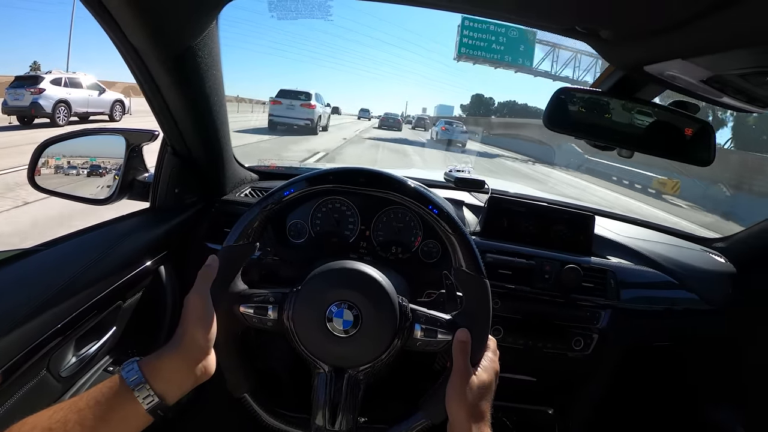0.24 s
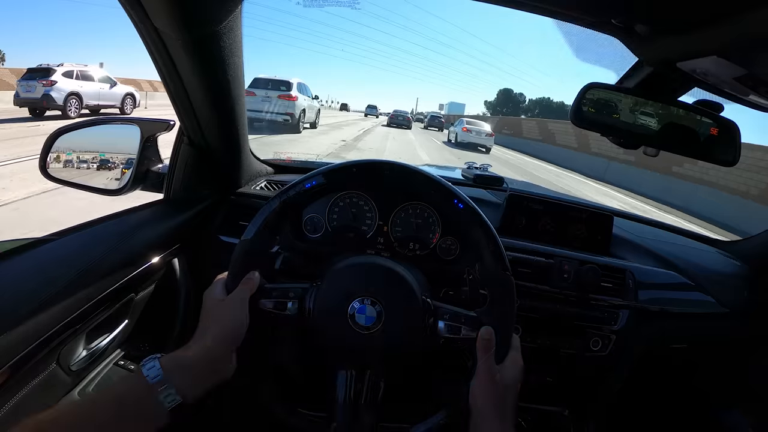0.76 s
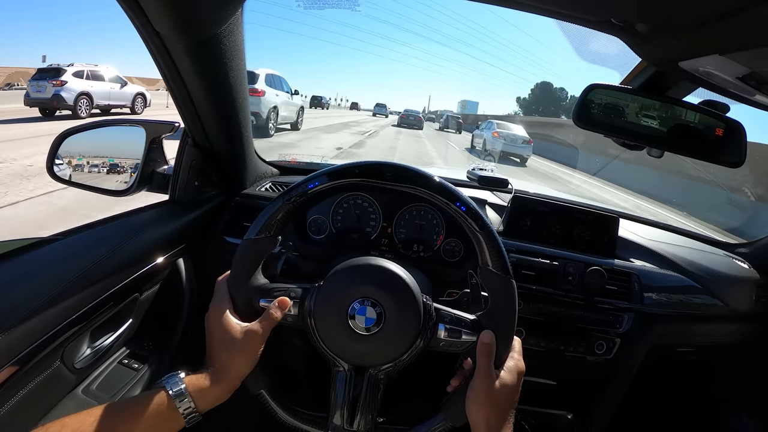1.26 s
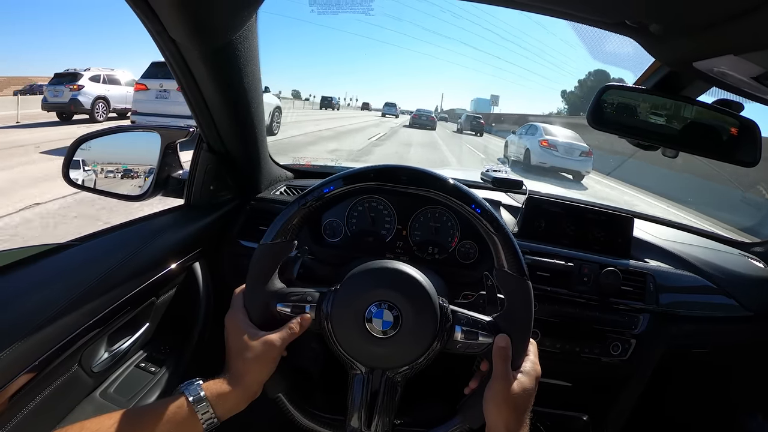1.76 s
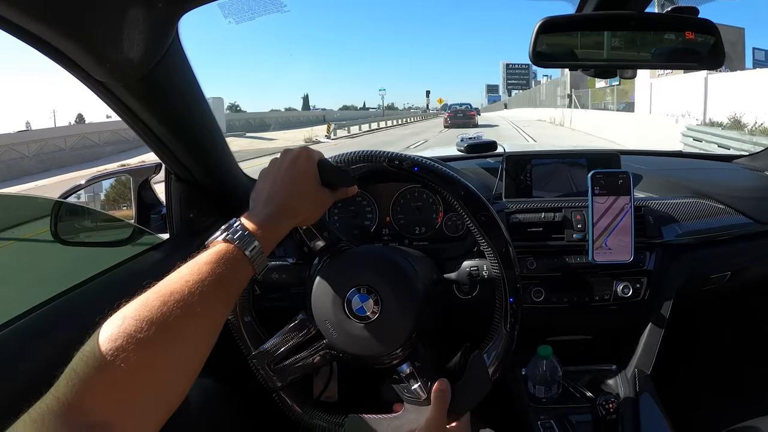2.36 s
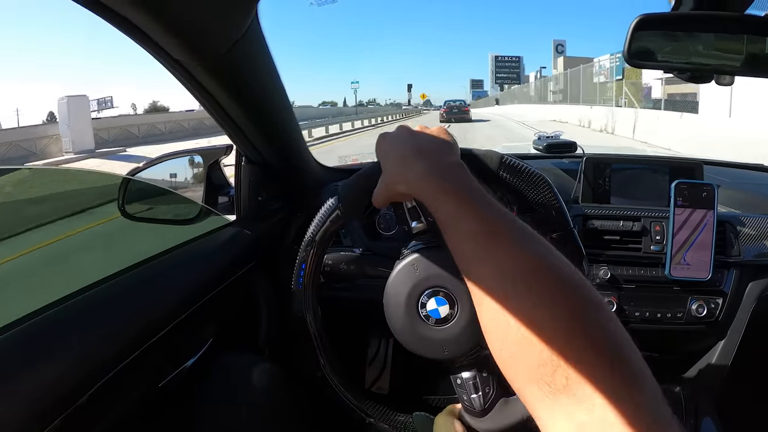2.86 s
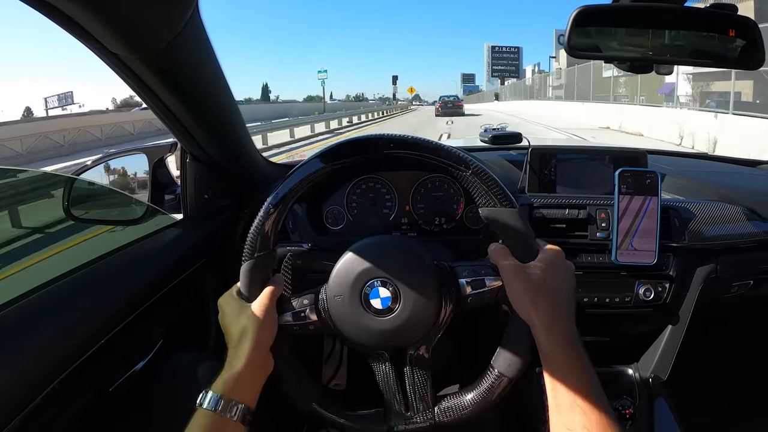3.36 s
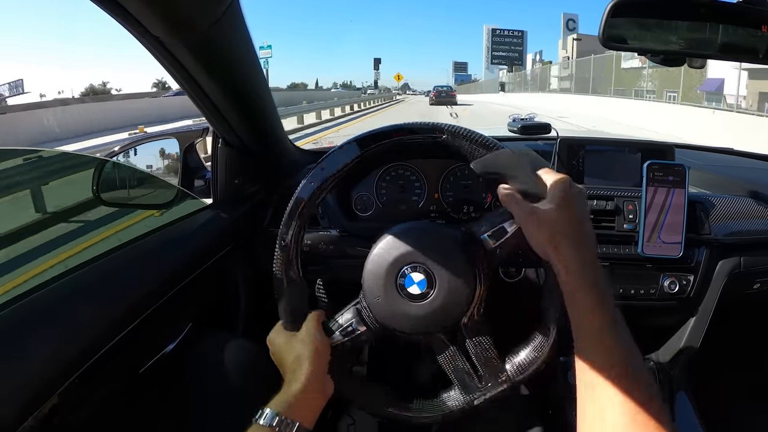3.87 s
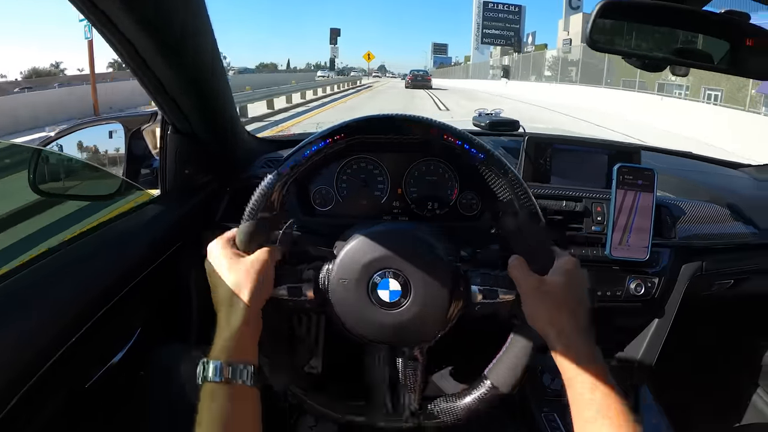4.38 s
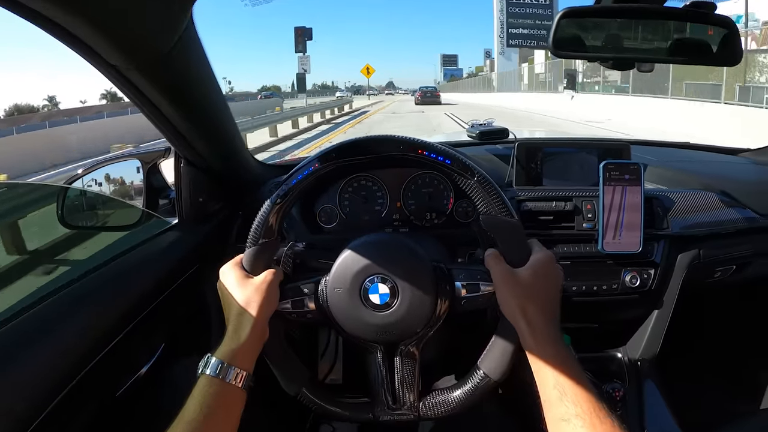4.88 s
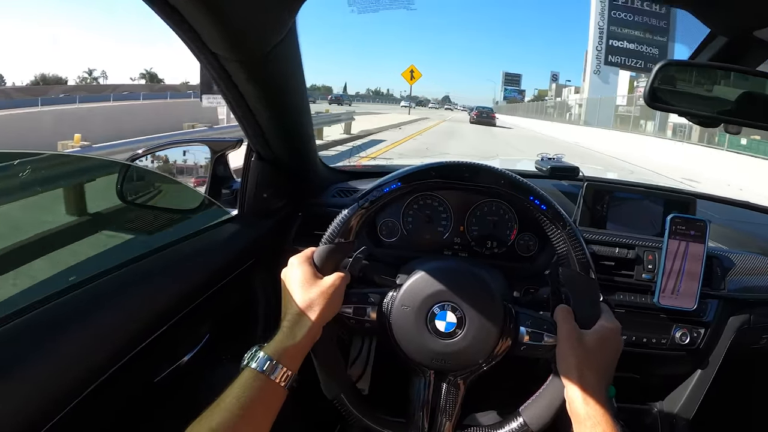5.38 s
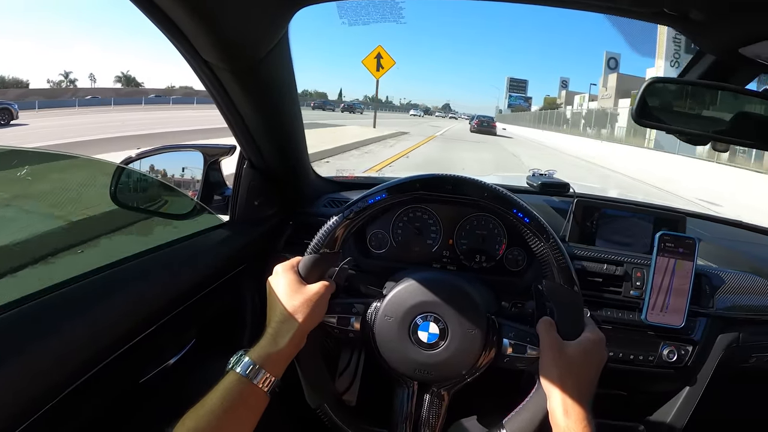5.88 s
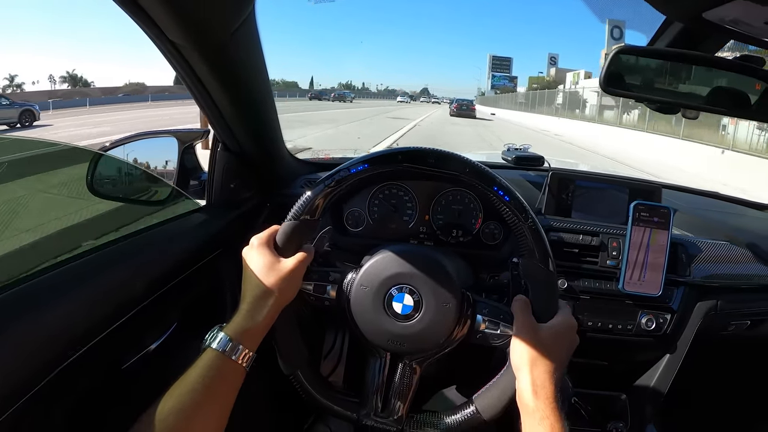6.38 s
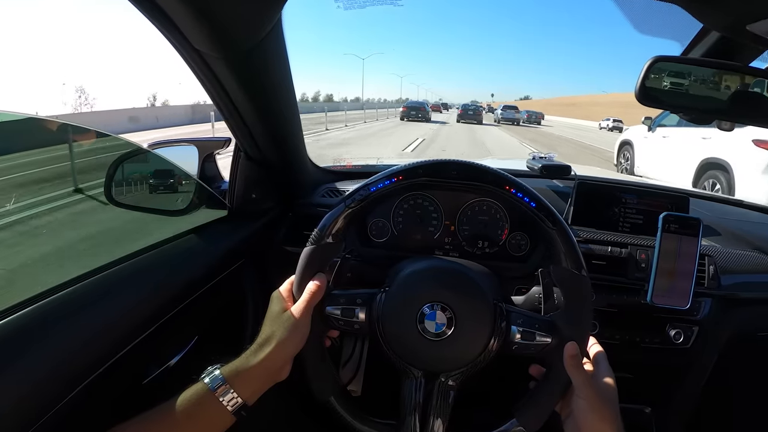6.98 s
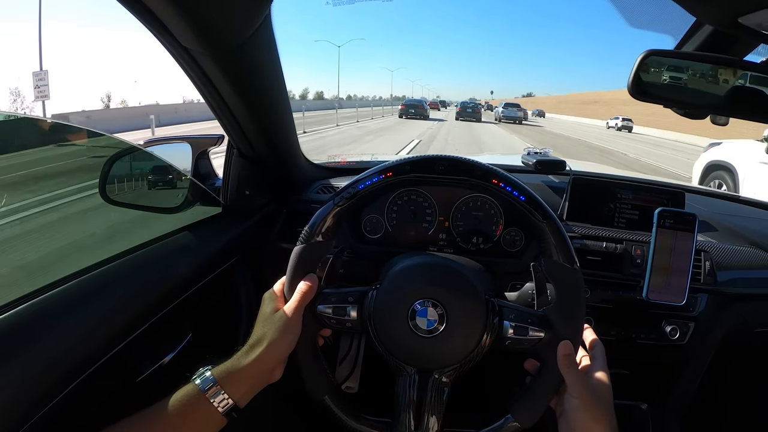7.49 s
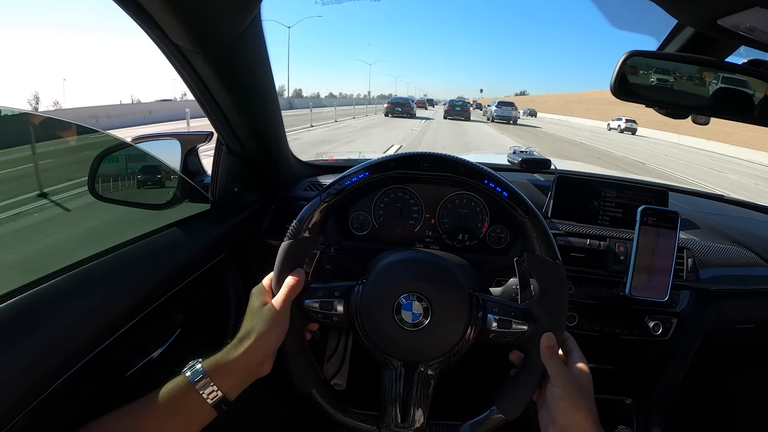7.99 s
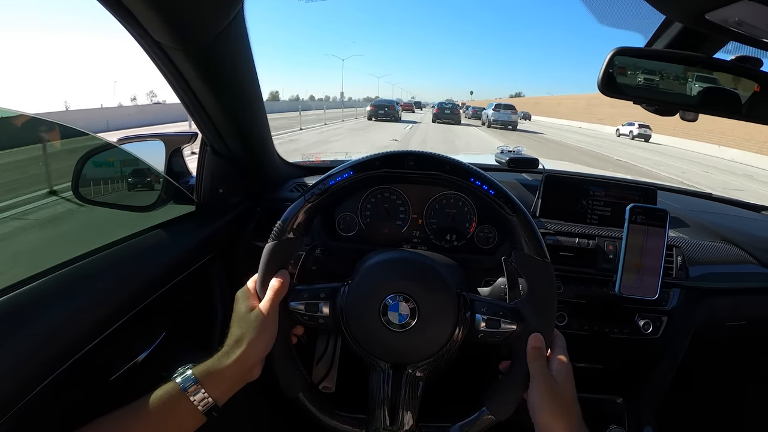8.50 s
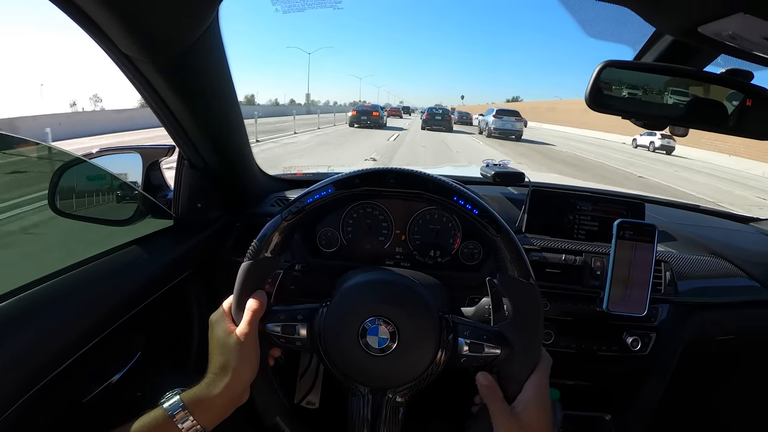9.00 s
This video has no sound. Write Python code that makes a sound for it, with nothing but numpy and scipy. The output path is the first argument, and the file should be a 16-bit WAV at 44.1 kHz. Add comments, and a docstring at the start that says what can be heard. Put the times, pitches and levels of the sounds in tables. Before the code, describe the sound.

Close inside a car with the window down, a deep exhaust hum swells and lifts off with a burble. A hard cut brings a fierce rising rev with slipping driveline rasp, then a sudden drop, clacks and sharp cracks as gears change. After another cut the engine pulls again, drops a gear-step, clicks and pops, then eases. Wind thump, tyre roar and airy hiss surround it throughout.

```python
"""Inside a turbocharged car with an open exhaust, window down, on a freeway: three stretches joined by hard cuts.
Engine and driveline are sums of sines on whole multiples of a gliding rate, coloured by body and pipe.
Burble, boom and cracks are pops ringing exhaust resonances; clicks are noise bursts coloured by trim.
Cabin thump, tyre roar, hiss and sizzle are shaped noise; a tyre whine and a trim buzz sound briefly.
Two close ports pick it up and a limiter holds the peaks."""
import sys
import numpy as np
from scipy import signal
from scipy.fft import rfft, irfft, next_fast_len
from scipy.io import wavfile
from scipy.ndimage import uniform_filter1d, minimum_filter1d, map_coordinates

SR = 44100
rng = np.random.default_rng(int(sys.argv[2]) if len(sys.argv) > 2 else 0)


def volts_from_db(level):
    """Convert decibel levels to linear amplitude ratios."""
    exponent = np.asarray(level, float) / 20
    return 10 ** exponent


def wav_record(signal):
    """Record a signal, one row per channel, as 16-bit PCM in the file named by sys.argv[1]."""
    frames = np.transpose(np.atleast_2d(signal))
    bounded = np.clip(frames, -1, 1)
    # unit amplitude maps onto the largest positive 16-bit level
    quanta = np.round(bounded * 32767).astype(np.int16)
    wavfile.write(sys.argv[1], SR, quanta)


N = 407925

# joins between the stretches: (time [s])
CUTS_S = [2.0148, 6.819]
# engine note: (time [s], pulse rate [Hz], fundamental [dB], load level that sets the overtones [dB],
# sharpness [dB per multiple])
ENGINE_NOTE = [(0.0, 78.4, -29.5, -18.5, -2.3), (0.35, 80.32, -25, -20, -0.9),
               (0.7, 82.7, -22.5, -18.5, 0.1), (0.92, 82.1, -19, -15.5, 1), (0.98, 80.1, -23.5, -29.5, -2),
               (1.6, 79.8, -13, -35, -0.3), (2.014, 78.57, -14.5, -31, -1), (2.015, 71.5, -31, -19, 1.5),
               (2.2, 77.27, -25, -23, -5), (2.35, 79.43, -24, -17.5, -3), (2.5, 89.9, -10.5, -28, -4),
               (2.65, 101.0, -11.5, -28.0, 1.0), (2.8, 117.2, -9.5, -23.0, 1.5),
               (2.95, 136.6, -4.5, -21.5, -2.5), (3.2, 153.4, -4, -25.5, -3.7),
               (3.48, 162.7, -6, -34.5, -8), (3.8, 177.0, -10.5, -30, -2.5), (4.12, 182.8, -10.5, -30.5, 2),
               (4.17, 159.2, -36, -34, 6), (4.24, 136.0, -16, -34.5, 0), (4.35, 128.9, -11.5, -41.5, -3.5),
               (4.52, 142.6, -7, -26.5, -5), (4.64, 134.6, -8, -32.0, -3.5), (4.75, 109.6, -19, -34.5, 0.5),
               (4.95, 95.6, -10.5, -25.5, 0.2), (5.15, 92.8, -9.5, -17.5, -0.2),
               (5.35, 93.97, -10, -20, 1.2), (5.515, 95.9, -10, -19, -0.5), (5.74, 98.6, -6.5, -22.5, 1.2),
               (5.82, 95.7, -15.5, -42.5, 1.5), (6.3, 96.6, -13.0, -39, -4.5), (6.5, 92.4, -17.5, -39.5, 0),
               (6.818, 93.4, -14.0, -37, -4.5), (6.819, 121.0, -10.5, -33.5, -2),
               (7.15, 124.7, -9.5, -25.5, -1.5), (7.55, 132, -7.5, -23.5, -3.5),
               (7.66, 97.3, -12.5, -26.5, 3), (7.76, 103.5, -8, -23, 1), (7.86, 101.4, -12, -31, 1.6),
               (8.22, 105.2, -11, -27.5, 1.5), (8.36, 106.5, -12.5, -26, 0.3),
               (8.66, 109.5, -10.5, -23.5, -0.5), (8.75, 110.9, -18, -33.5, 0.7),
               (9.0, 106.8, -15, -40, 0.4), (9.25, 104.8, -15.5, -39, -5)]


def unit(x):
    """Scale to rms 1."""
    return x / np.sqrt(np.mean(x ** 2) + 1e-20)


def along(points, hz):
    """Interpolate (frequency [Hz], value) points on a log axis."""
    f, v = np.transpose(points)
    return np.interp(np.log(hz + 1), np.log(f + 1), v)


def curves(rows):
    """One value per sample for each column after the time."""
    s, *cols = np.transpose(rows)
    t = np.arange(N) / SR
    return np.array([np.interp(t, s, c) for c in cols])


def swells(rows, floor_db=-90):
    """Level [dB] of bell-shaped (time [s], half length [s], level [dB]) swells added to a floor."""
    t = np.arange(N) / SR
    bells = sum(volts_from_db(db) * np.exp(-((t - s) / half) ** 2) for s, half, db in rows)
    return 20 * np.log10(volts_from_db(floor_db) + bells)


def wobble(knots_per_s):
    """Smooth random curve through normal knots."""
    knots = rng.standard_normal(int(N * knots_per_s / SR) + 4)
    return map_coordinates(knots, [np.arange(N) * knots_per_s / SR])


def stretch():
    """Index of the stretch of driving that each sample lies in."""
    return np.searchsorted(CUTS_S, np.arange(N) / SR)


def filtered(x, response):
    """Apply a complex response of frequency [Hz]."""
    m = next_fast_len(N + SR // 2)
    return irfft(rfft(x, m) * response(np.fft.rfftfreq(m, 1 / SR)), m)[..., :N]


def resonances(modes, f):
    """Causal sum of (frequency [Hz], width [Hz], level [dB]) resonances, alternating in sign."""
    total = 0
    for k, (centre, width, db) in enumerate(modes):
        total = total + (-1) ** k * volts_from_db(db) * 1j * f * width / (centre * centre - f * f + 1j * f * width)
    return total


def turning(rate_hz):
    """Shaft phase [rad]."""
    return 2 * np.pi * np.cumsum(rate_hz) / SR


def stack(phase, levels_db, waver_db, lean_rad):
    """Sines on whole multiples; each wavers on its own, the higher the more; lean skews the pulse shape."""
    total = 0
    for k, db in enumerate(levels_db):
        level = np.sqrt(2) * volts_from_db(db + waver_db * np.sqrt(k + 1) * wobble(9))
        total = total - level * np.cos((k + 1) * phase + lean_rad * k)
    return total


def overtones(rate_hz, orders, level_db, sharp_db, odd_db=0):
    """Levels from multiple 2 up, tilted about the third, coloured by exhaust and cabin."""
    # exhaust and cabin as the low multiples meet them: (frequency [Hz], gain [dB])
    body = [(140, 5.5), (165, .4), (195, 0.3), (215, 4), (240, 0.2), (265, -2.5), (290, -3), (320, 4),
            (350, 0.6), (380, -2), (410, 0.8), (450, -2.2), (490, 0.2), (520, 4), (560, 1), (600, -0.4),
            (625, -7.5), (652, 3.5), (690, -12.5), (745, -4), (800, -9.5)]
    return [level_db + db + sharp_db * (k - 1) + odd_db * (k % 2) + along(body, (k + 2) * rate_hz)
            for k, db in enumerate(orders)]


def through_pipe(rate_hz, levels_db, count, rasp_db):
    """Add upper multiples up to count, which light up as they cross a pipe resonance."""
    # exhaust pipe as the upper multiples meet it: (frequency [Hz], width [Hz], gain [dB])
    pipe = [(770, 90, -2), (915, 70, 3), (1040, 100, 0), (1250, 200, -3)]
    upper = range(len(levels_db) + 1, count + 1)
    return levels_db + [rasp_db + 20 * np.log10(abs(resonances(pipe, k * rate_hz))) for k in upper]


def engine():
    """Firing note, nearly steady from pulse to pulse; load brings up the overtones. Returns note and phase."""
    # multiples 2 to 7: (level over the load [dB])
    engine_orders = [9, 0.5, 0.86, -1.1, -7, -2.4]
    # upper multiples: (time [s], level [dB])
    rasp = [(0, -44), (2.3, -46), (2.9, -33), (3.1, -32), (3.5, -38), (4.3, -50), (4.9, -44), (5.1, -33),
            (5.7, -34), (5.9, -55), (6.8, -55), (7.0, -41), (7.5, -35), (7.72, -29), (7.9, -33),
            (8.65, -32), (8.9, -55)]
    rate_hz, first_db, load_db, sharp_db = curves(ENGINE_NOTE)
    # a fundamental less than 13 dB over the load takes the odd multiples down with it
    odd_db = .68 * np.minimum(first_db - load_db - 13, 0)
    levels_db = [first_db] + overtones(rate_hz, engine_orders, load_db, sharp_db, odd_db)
    phase = turning(rate_hz * (1 + .0015 * wobble(25)))
    levels_db = through_pipe(rate_hz, levels_db, count=13, rasp_db=curves(rasp)[0])
    return stack(phase, levels_db, waver_db=.9, lean_rad=.3), phase


def driveline():
    """Second shaft note, middle stretch only; parts from the engine while the clutch or tyres slip."""
    # (time [s], rate [Hz], level [dB], sharpness [dB per multiple])
    shaft_note = [(2.015, 99.45, -25, 1.5), (2.2, 103.3, -22.5, 3.6), (2.5, 116, -25, -2.5),
                  (2.85, 127.8, -22, 0), (3.3, 147, -27.5, 0.6), (3.75, 153.3, -26, 1),
                  (3.87, 138.7, -25, -1.8), (4.12, 123.6, -29, -3), (4.22, 105.7, -21.5, 0.7),
                  (4.3, 109, -39.5, -3), (4.8, 108.7, -34, -2.5), (5.3, 111.2, -33.5, -2.5),
                  (5.8, 112.6, -40.5, -6), (6.05, 115.5, -37.5, -7), (6.5, 115.9, -34.5, -6),
                  (6.75, 110.8, -46.5, -4.5)]
    # multiples 2 to 5: (level over the note's level [dB])
    shaft_orders = [5, -0.7, -2.1, -3.5]
    # fundamental sounds briefly: (time [s], half length [s], level [dB])
    shudders = [(3.87, 0.057, -23.5), (4.17, .07, -8), (4.8, 0.068, -28), (6.5, .05, -8.5)]
    # upper multiples flare: (time [s], half length [s], level [dB])
    slip_rasp = [(2.55, .15, -33), (2.92, .1, -23), (3.43, .1, -28), (3.67, .08, -30)]
    rate_hz, level_db, sharp_db = curves(shaft_note)
    first_db = swells(shudders, floor_db=-42.5)
    levels_db = [first_db] + overtones(rate_hz, shaft_orders, level_db, sharp_db)
    levels_db = through_pipe(rate_hz, levels_db, count=9, rasp_db=swells(slip_rasp, floor_db=-49))
    return (stretch() == 1) * stack(turning(rate_hz), levels_db, waver_db=1.1, lean_rad=1.3)


def pops(modes, rate_hz):
    """Uneven soft pops at random times ringing a set of resonances, rms 1."""
    kicks = (rng.random((2, N)) < rate_hz / SR) * rng.standard_normal((2, N))
    soft = lambda f: f ** 2 / (f ** 2 + 55 ** 2) / (1 + 1j * f / 1500) ** 3
    return unit(filtered(kicks, lambda f: resonances(modes, f) * soft(f)))


def burble(air_swing_db):
    """Unburnt fuel and road shake: a dense rattle of the exhaust box that bursts on lift-off."""
    # exhaust box as loose pops meet it: (frequency [Hz], width [Hz], gain [dB])
    box = [(84.5, 67, 9), (212, 102, 6), (332, 74.8, 4), (536, 162, -1.5), (1020, 310, -9.5)]
    # bursts: (time [s], half length [s], level [dB])
    lift_offs = [(.975, .035, -13.5), (1.95, .05, -22.5), (4.2, 0.042, -16.5), (5.81, .06, -12.5),
                 (2.98, 0.081, -21), (7.74, 0.096, -20), (8.72, .1, -19)]
    # one per stretch: (floor level when the hiss is at -40 dB [dB])
    burble_db = [-23, -19.5, -19.5]
    level_db = swells(lift_offs, np.take(burble_db, stretch()) + .2 * air_swing_db)
    rattle = pops(box, rate_hz=900)
    # pops below about 130 Hz thin out by .4 dB for each Hz the engine runs above 130 Hz
    low = filtered(rattle, lambda f: 1 / (1 + (f / 130) ** 6))
    kept = volts_from_db(-.4 * np.clip(curves(ENGINE_NOTE)[0] - 130, 0, None))
    return volts_from_db(level_db + 1.2 * wobble(12)) * (rattle - (1 - kept) * low)


def boom():
    """Loose pops ringing the exhaust box's boom resonance; it is filtered through the resonance twice."""
    # (frequency [Hz], width [Hz], gain [dB])
    boom_mode = [(136.6, 30, 0)]
    # (time [s], half length [s], level [dB])
    booms = [(.82, 0.054, -18), (1.2, 0.036, -23), (1.75, .2, -17), (3.95, 0.23, -17.5), (4.28, .05, -15),
             (4.72, 0.076, -12), (5.8, .05, -16.5), (6.33, 0.046, -14), (6.5, 0.11, -15.5),
             (7.62, 0.045, -21), (8.2, 0.44, -19.5), (8.72, 0.037, -11.5), (8.83, .04, -10.5),
             (9.22, .05, -18.5)]
    ringing = unit(filtered(pops(boom_mode, rate_hz=150), lambda f: resonances(boom_mode, f)))
    return volts_from_db(swells(booms, floor_db=-33)) * ringing


def cracks():
    """Single sharp pops, each ringing the pipe as a decaying sine near 960 Hz."""
    # (time [s], level before a 2.5 dB cut [dB])
    crack_rows = [(4.375, -23), (4.583, -15.5), (4.601, -9.5), (5.786, -11.5), (5.846, -7), (7.157, -7.5),
                  (8.773, -15.5)]
    t60_s = .04
    out, t = np.zeros(N + SR), np.arange(SR // 10) / SR
    for s, db in crack_rows:
        hz = 960 * (1 + .04 * rng.standard_normal())
        out[round(s * SR):][:len(t)] += volts_from_db(db - 2.5 - 60 * t / t60_s) * np.sin(2 * np.pi * hz * t)
    return out[:N]


def clicks():
    """Dry plastic clack of a paddle or trim piece: noise burst with a weaker cabin tail, coloured by trim."""
    # (time [s], level before a 4 dB cut and the trim [dB], left-right [dB])
    click_rows = [(.985, -30, -1), (1.015, -25.5, -1), (1.045, -29, -3), (4.4178, -9.5, -1.0),
                  (4.5306, -13, -5), (4.587, -18, -9.5), (4.602, -23, -12), (4.618, -30, -5.5),
                  (4.8984, -31.5, -2), (5.018, -39.5, -2), (5.7906, -36, -10), (6.619, -35, -7.5),
                  (7.3282, -21.5, -6.5), (7.3525, -13.5, -1), (7.45, -15, -5.5), (8.1568, -34, -18)]
    # trim resonances: (frequency [Hz], width [Hz], gain [dB])
    trim = [(1500, 500, -0.5), (2280, 780, 6), (3400, 690, 5.5), (5140, 900, 5.5), (7000, 900, 1.5),
            (9700, 4700, -10)]
    out, t = np.zeros((2, N + SR)), np.arange(SR // 8) / SR
    attack = 1 - np.exp(-t / .0006)
    shape = attack * (volts_from_db(-60 * t / .035) + .2 * volts_from_db(-60 * t / .14))
    for s, db, pan_db in click_rows:
        near, left, right = rng.standard_normal((3, len(t)))
        gain = volts_from_db(db - 4 + np.array([[pan_db], [-pan_db]]) / 2)
        out[:, round(s * SR):][:, :len(t)] += gain * shape * (near + .6 * np.array([left, right]))
    band = lambda f: f ** 2 / (f ** 2 + 1200 ** 2) / (1 + 1j * f / 9000) ** 3
    return filtered(out[:, :N], lambda f: resonances(trim, f) * band(f))


def tyre_whine():
    """Brief fluttering tone from the road surface: a sine wandering about 1410 Hz."""
    # (time [s], half length [s], level [dB])
    whine_swells = [(9.07, .07, -30), (9.23, 0.065, -28)]
    hz = 1410 + 12 * wobble(12)
    return np.sqrt(2) * volts_from_db(swells(whine_swells)) * np.sin(turning(hz))


def trim_buzz():
    """Loose trim buzzing: noise passed twice through narrow resonances."""
    # (time [s], half length [s], level [dB])
    buzz_swells = [(8.02, .06, -42), (8.16, .07, -41), (8.31, .04, -42)]
    # (frequency [Hz], width [Hz], gain per pass [dB])
    buzz_modes = [(2610, 77, -4), (3200, 87, -6.5), (3240, 66, -4.5)]
    buzz = unit(filtered(rng.standard_normal(N), lambda f: resonances(buzz_modes, f) ** 2))
    return volts_from_db(swells(buzz_swells) + 2.5 * wobble(30)) * buzz


def rush(spectrum, patchy_db):
    """Two shaped noises, rms 1, with shared time-frequency patches of random gain."""
    z = signal.stft(rng.standard_normal((2, N)), nperseg=512)[2]
    field = uniform_filter1d(rng.standard_normal(z.shape[1:]), size=6, axis=0)
    field = uniform_filter1d(field, size=12, axis=1)
    pair = signal.istft(z * volts_from_db(patchy_db * unit(field)), nperseg=512)[1][:, :N]
    return unit(filtered(pair, lambda hz: volts_from_db(along(spectrum, hz))))


def thump():
    """Open window makes the cabin air throb: low noise with its swells partly evened out."""
    # wind at the open window: (time [s], level [dB])
    cabin = [(0.0, -25.5), (0.05, -20.5), (0.72, -17), (0.8, -26.5), (1.0, -13), (1.72, -18), (1.75, -12.5),
             (1.98, -12.5), (2.01, -27.5), (2.29, -25), (2.39, -36.5), (2.5, -20.5), (3.3, -24.5),
             (3.99, -18), (4.17, -27), (4.33, -16.5), (5.69, -22.5), (5.87, -16.5), (6.34, -18.5),
             (6.39, -27.5), (6.57, -11.5), (6.65, -16), (6.98, -10.5), (7.01, -19), (9.2, -12.5),
             (9.25, -25.5)]
    # (frequency [Hz], relative density [dB per Hz])
    thump_spectrum = [(8.8, -29.5), (15, -13), (37, 1), (65, -12), (84, -41.5), (140, -120)]
    level_db = curves(cabin)[0] + .92 * wobble(3.6)
    throb = rush(thump_spectrum, patchy_db=-1.5)
    swell = np.sqrt(abs(uniform_filter1d(throb[0] ** 2, size=2600)) + .1)
    return volts_from_db(level_db) * unit(throb / swell ** .6)


def roar(air_swing_db):
    """Tyre roar: mid-band noise that takes a share of the air's swings."""
    # (frequency [Hz], relative density [dB per Hz])
    roar_spectrum = [(400, -31), (600, -8.5), (780, -6), (880, -2), (945, 2), (1180, -2), (1400, -3),
                     (1650, -10), (1900, -12.5), (2500, -19.5), (4000, -61.5)]
    # one per stretch: (level when the hiss is at -40 dB [dB])
    roar_db = [-23.5, -24.5, -23.5]
    return volts_from_db(np.take(roar_db, stretch()) + .68 * air_swing_db) * rush(roar_spectrum, patchy_db=1)


def hiss(hiss_db):
    """Rushing air: upper-band noise at the air's own level."""
    # (frequency [Hz], relative density [dB per Hz])
    hiss_spectrum = [(900, -40), (1600, -43), (2600, -8), (3500, -12), (5000, -21), (7000, -35),
                     (10000, -53.5), (20000, -100)]
    return volts_from_db(hiss_db + .6 * wobble(25)) * rush(hiss_spectrum, patchy_db=.8)


def sizzle(air_swing_db):
    """Treble noise that swings further than the air level."""
    # (frequency [Hz], relative density [dB per Hz])
    sizzle_spectrum = [(2500, -30), (4500, -9.5), (6000, -3.5), (8000, -11), (10500, -22.5), (15000, -54.5),
                       (20000, -74)]
    # one per stretch: (level when the hiss is at -40 dB [dB])
    sizzle_db = [-58.5, -55.5, -55.5]
    level_db = np.take(sizzle_db, stretch()) + 1.2 * air_swing_db
    return volts_from_db(level_db + wobble(30)) * rush(sizzle_spectrum, patchy_db=1.2)


def spread(pair):
    """Mix two unrelated signals into left and right of a set likeness at each frequency."""
    # (frequency [Hz], left-right likeness [correlation])
    alike = [(30, .99), (60, .998), (200, .99), (340, .96), (600, .9), (1070, .88), (1900, .7), (4000, .3),
             (9000, .25)]
    turn = lambda hz: np.arccos(np.clip(along(alike, hz), -1, 1)) / 2
    mid, side = filtered(pair, lambda hz: np.array([np.cos(turn(hz)), np.sin(turn(hz))]))
    return np.array([mid + side, mid - side])


def splices():
    """The wave jumps at each join and settles exponentially."""
    # one per join: (step [dB])
    step_db = [-2.5, -13]
    settle_s = .002
    t = np.arange(N) / SR
    return sum(volts_from_db(db) * (t >= s) * np.exp(-abs(t - s) / settle_s) for s, db in zip(CUTS_S, step_db))


def scene():
    """Exhaust in the middle, air and road around it; one air flow drives hiss, roar, sizzle and burble."""
    # strength of the rushing air: (time [s], hiss level [dB])
    air_flow = [(0, -38), (.26, -41), (.9, -40), (1.04, -36), (1.1, -40.5), (1.45, -37), (2.014, -36.5),
                (2.02, -47.5), (2.08, -49), (2.2, -35), (2.43, -46), (2.95, -29.5), (3.3, -38.5),
                (3.6, -35), (3.71, -39), (3.82, -35), (3.98, -43), (4.17, -29.5), (4.27, -34.5),
                (4.36, -52), (4.6, -44.5), (4.94, -51), (5.02, -40.5), (5.12, -47.5), (5.32, -40),
                (5.7, -45), (5.83, -38), (5.96, -52.5), (6.4, -50), (6.818, -45), (6.83, -38.5),
                (7.1, -41.5), (7.6, -39.5), (7.76, -32.5), (7.9, -40), (8.12, -35), (8.58, -39),
                (8.74, -33), (8.92, -40.5), (9.25, -41.5)]
    hiss_db = curves(air_flow)[0]
    air_swing_db = hiss_db + 40  # swing around a middling air level of -40 dB
    note, phase = engine()
    puff = 1 + .15 * np.cos(phase - 1.2)  # roar, hiss and sizzle pulse with the engine
    around = thump() + burble(air_swing_db) + boom()
    around += puff * (roar(air_swing_db) + hiss(hiss_db) + sizzle(air_swing_db))
    sway = volts_from_db(.3 * wobble(14) * np.array([[1], [-1]]))  # the notes drift a little from side to side
    middle = (note + driveline()) * sway + tyre_whine() + trim_buzz() + cracks() + splices()
    return middle + spread(around) + clicks()


def top_cut(x):
    """Nothing passes above the cut-off."""
    return signal.sosfilt(signal.butter(12, 16000, fs=SR, output="sos"), x)


def record(dry):
    """Two close ports; a limiter ducks ahead of loud peaks to hold them to .99 of full scale."""
    # (frequency [Hz], left-right [dB])
    balance = [(30, -.8), (60, 0), (300, .1), (600, -.6), (1400, -1.8), (2800, -1), (5000, -.4),
               (10000, .7)]
    # (frequency [Hz], phase by which the left port leads [rad])
    lead = [(0, 0), (950, 0.1), (1810, 1.3), (2330, 0.5), (3530, 1.2)]
    side = np.array([[1], [-1]])
    tilt = lambda hz: volts_from_db(side * along(balance, hz) / 2)
    delay = lambda hz: np.exp(.5j * side * np.interp(hz, *np.transpose(lead)))
    ports = filtered(dry, lambda hz: tilt(hz) * delay(hz))
    needed = np.minimum(1, .99 / (abs(ports).max(axis=0) + 1e-9))
    gain = uniform_filter1d(minimum_filter1d(needed, size=161), size=161)
    return top_cut(ports * gain)


dry = scene()
out = record(dry)
wav_record(out)
```